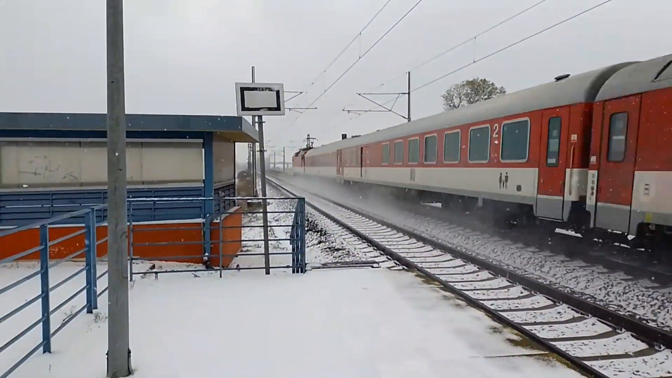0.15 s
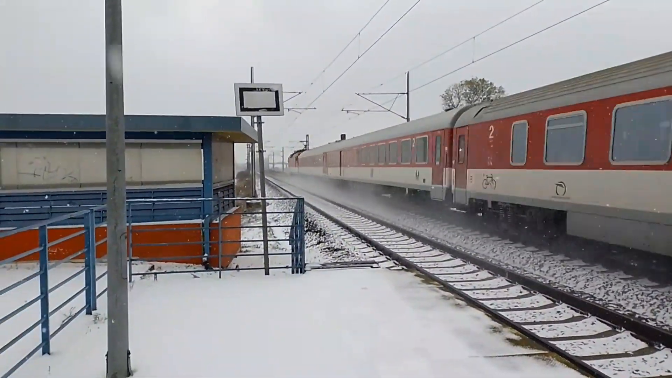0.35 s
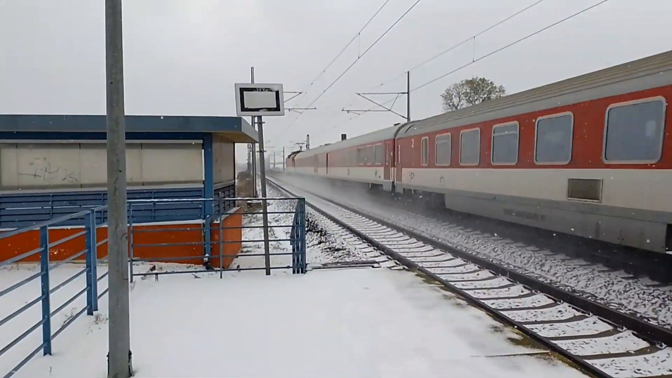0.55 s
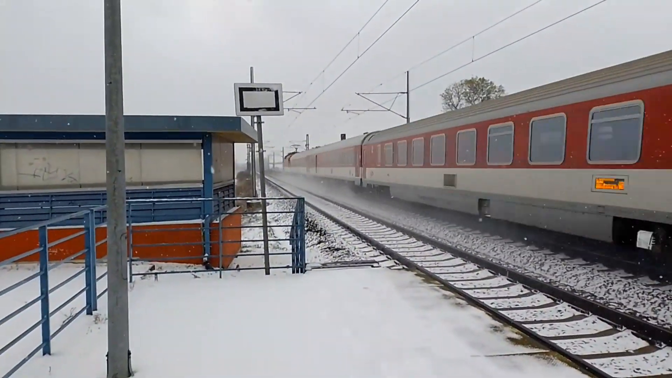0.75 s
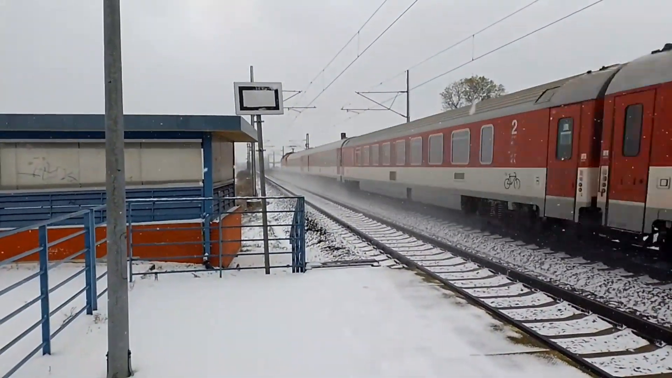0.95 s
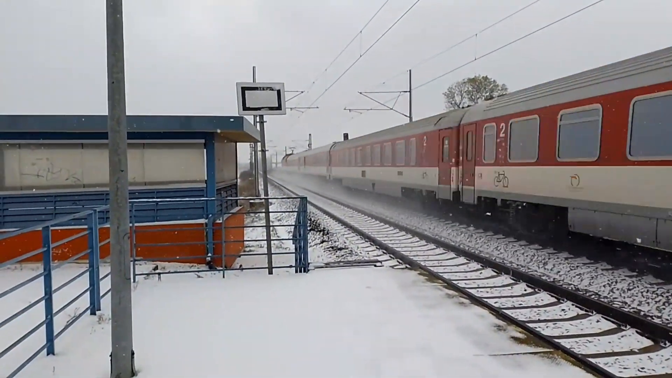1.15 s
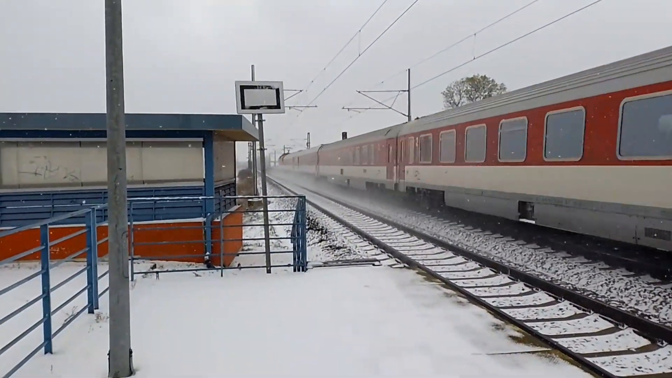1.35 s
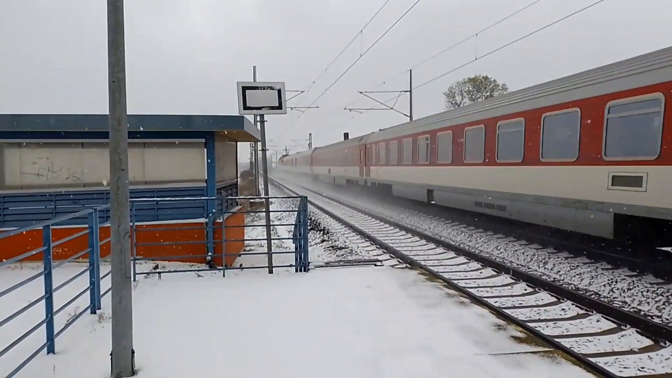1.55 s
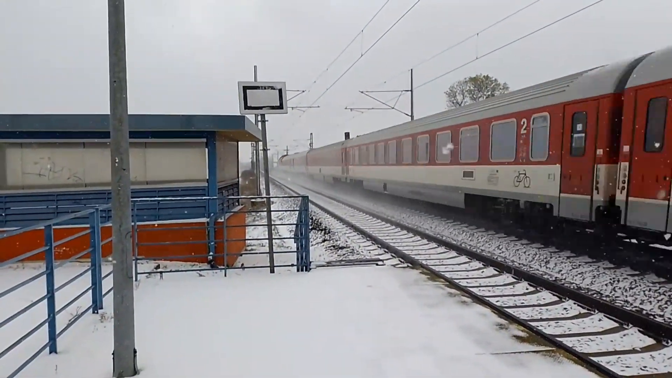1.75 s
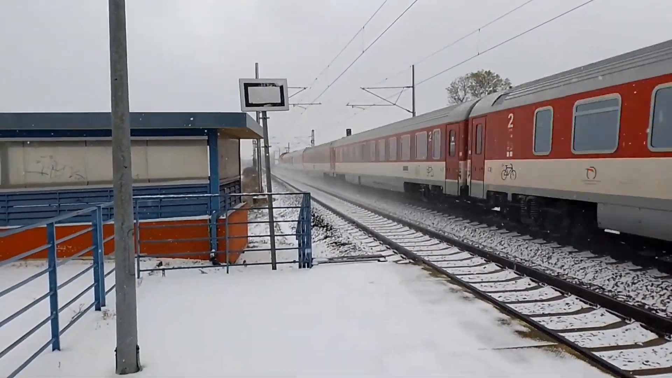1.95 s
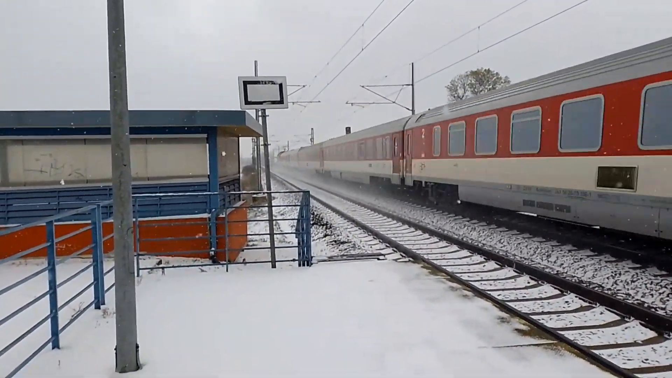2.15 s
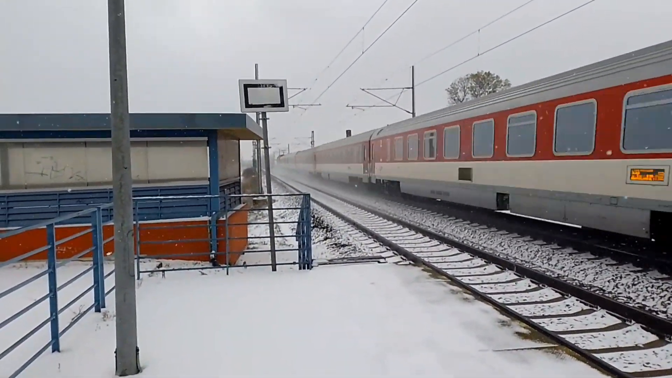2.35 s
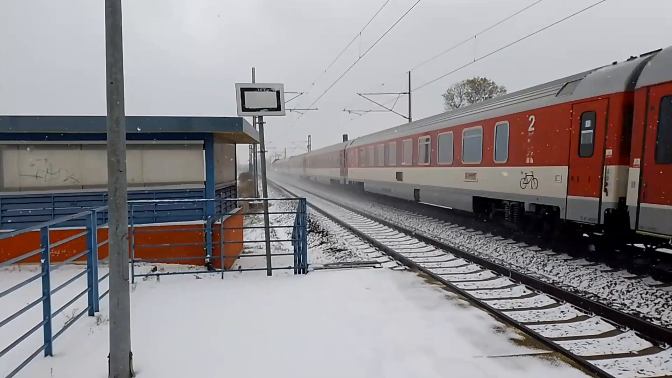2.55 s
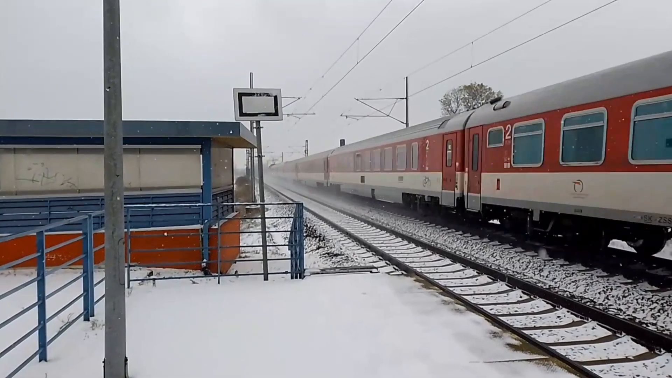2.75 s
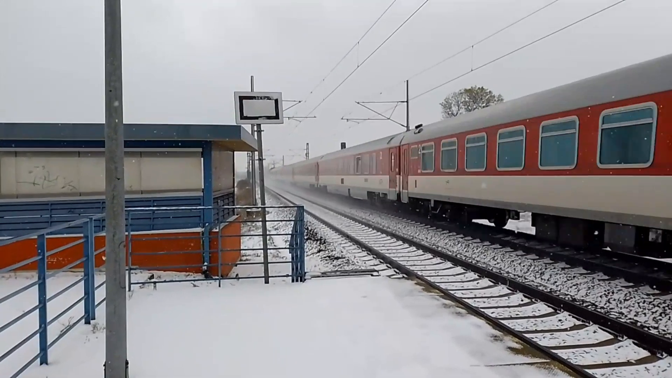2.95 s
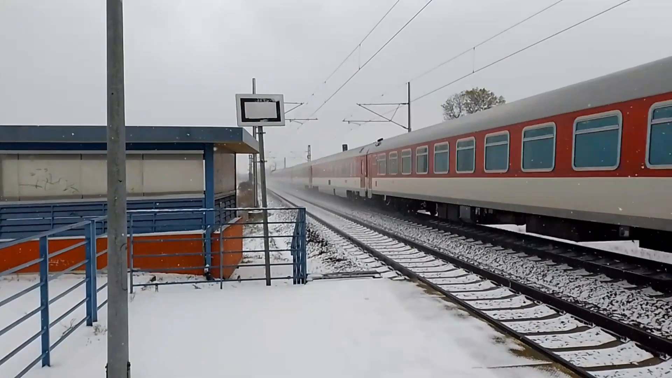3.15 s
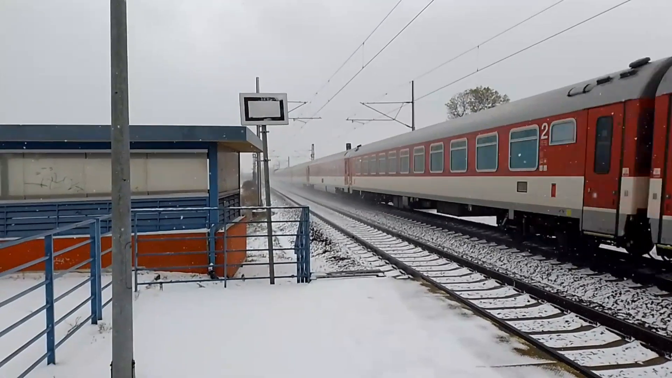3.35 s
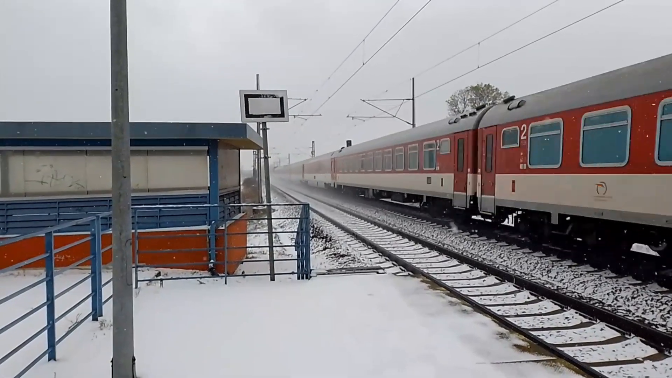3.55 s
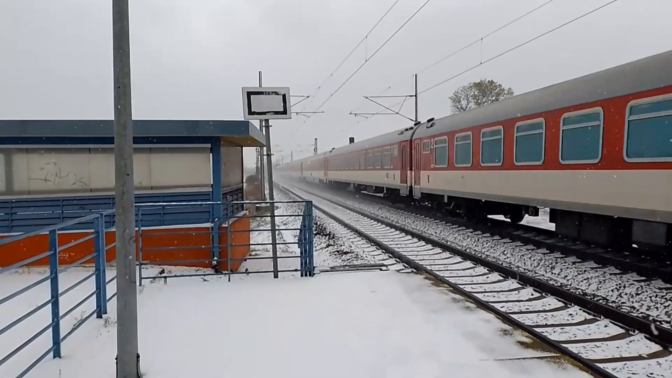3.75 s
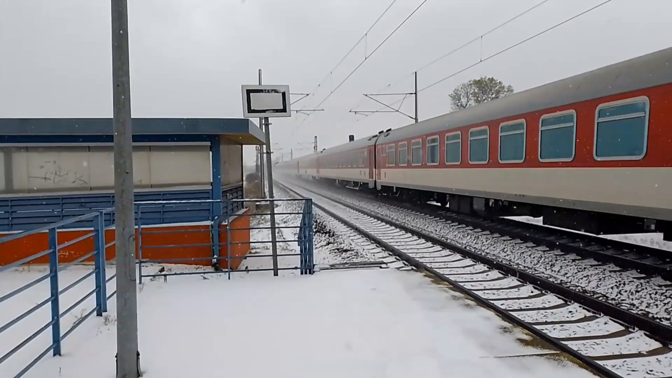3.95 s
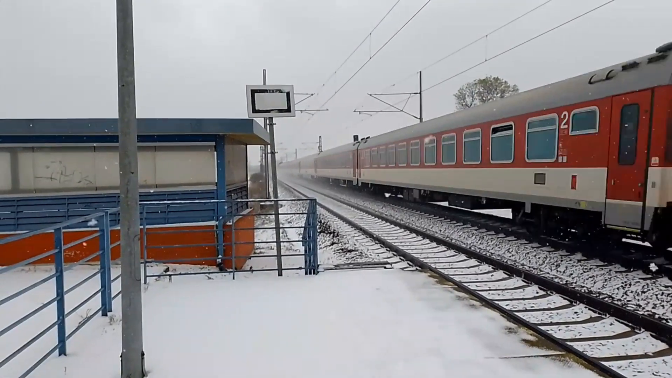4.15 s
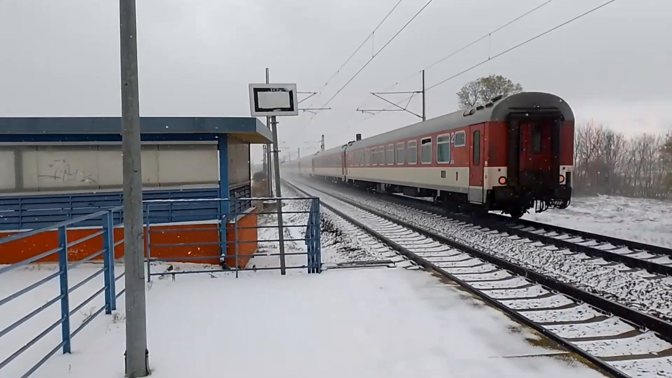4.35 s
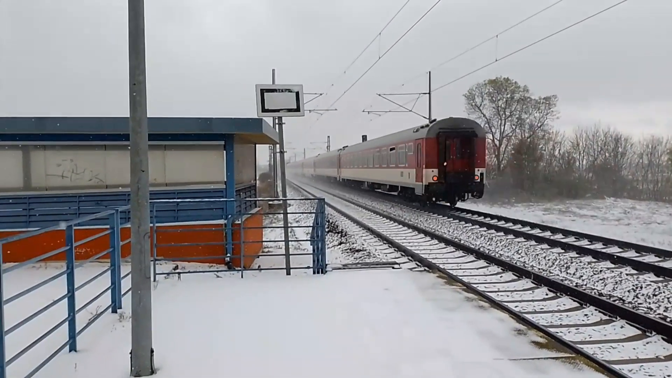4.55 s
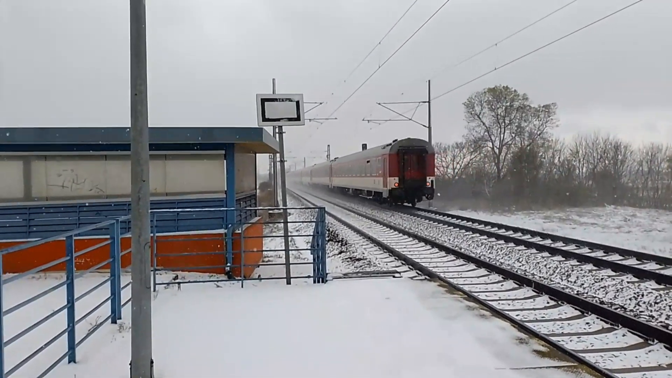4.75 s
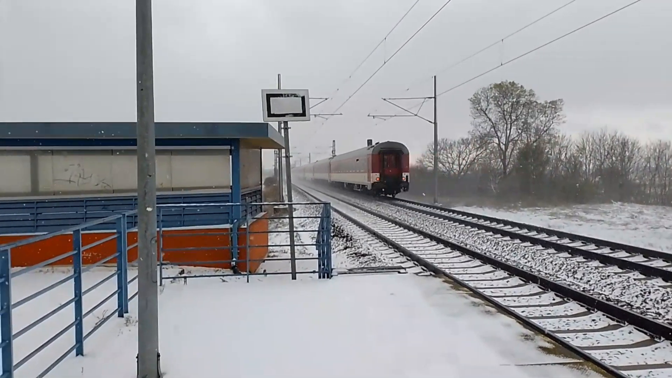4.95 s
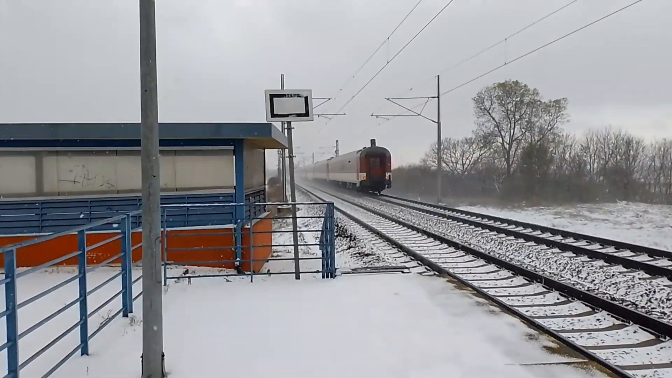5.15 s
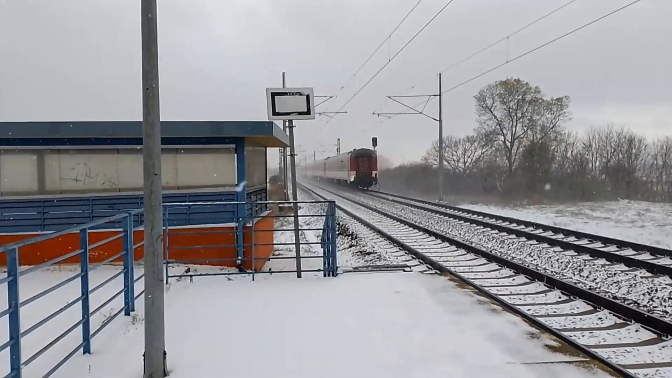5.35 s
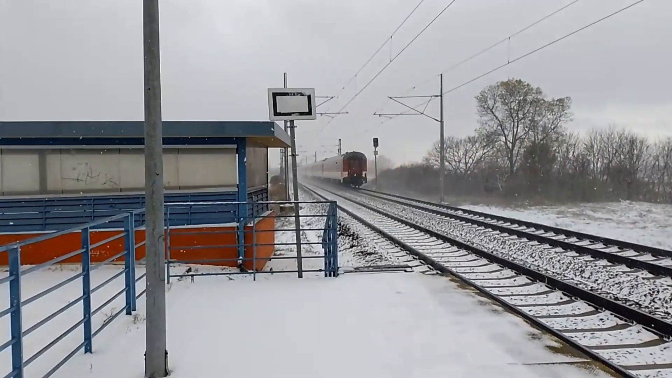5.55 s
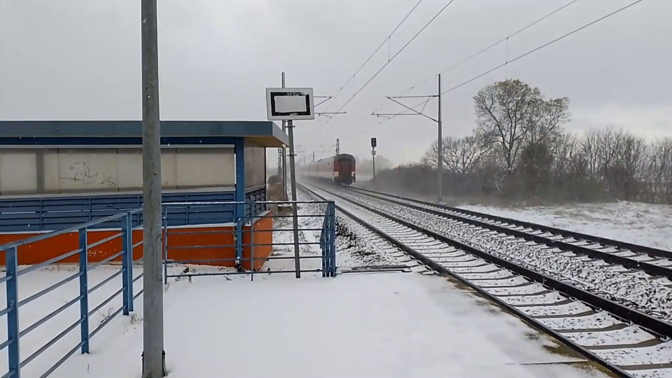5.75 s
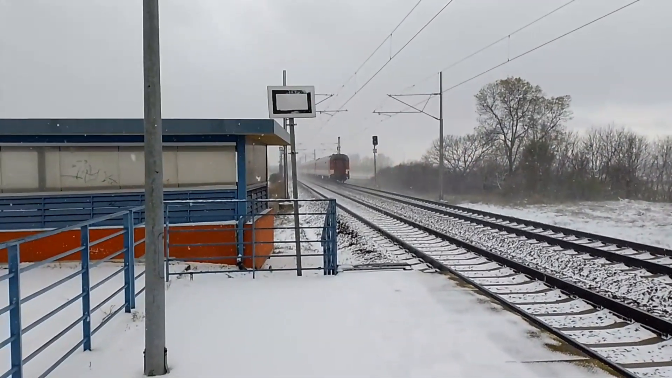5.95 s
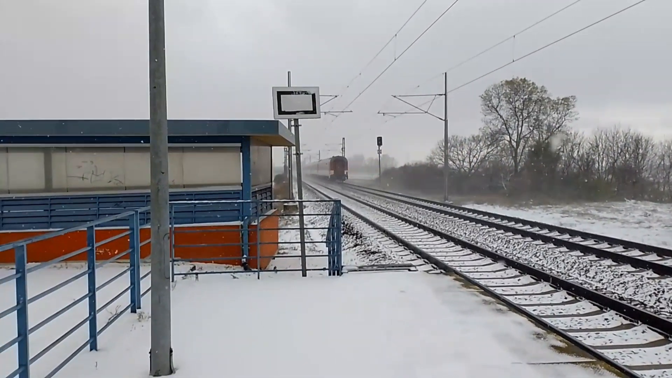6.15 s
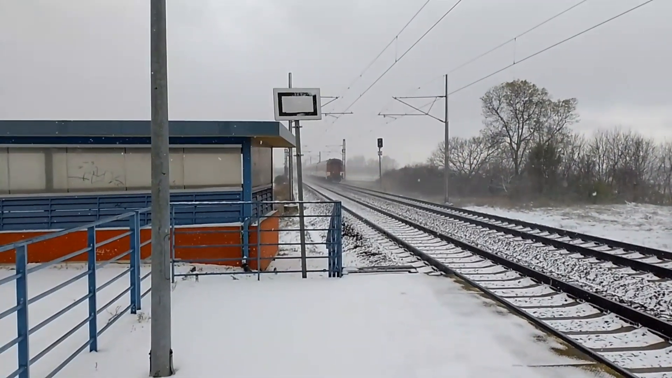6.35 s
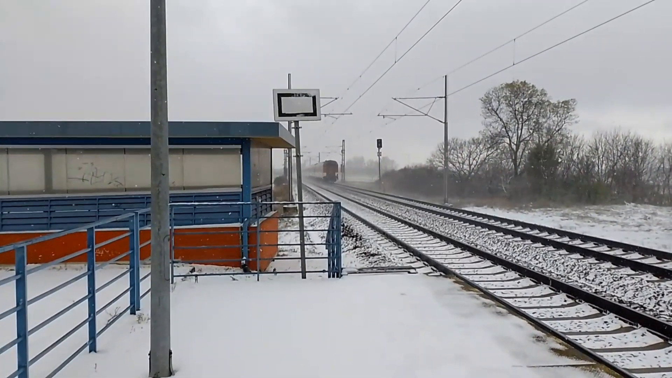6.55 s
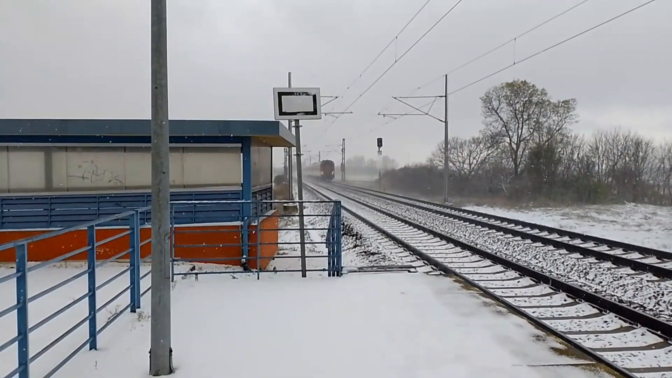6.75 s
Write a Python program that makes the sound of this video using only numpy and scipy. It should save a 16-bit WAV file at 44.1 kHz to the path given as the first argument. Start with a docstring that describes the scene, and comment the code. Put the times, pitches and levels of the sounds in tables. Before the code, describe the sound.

Loud rolling roar of fast railway coaches passing with clanking wheels and brief metallic squeals, dropping quickly to a thin rail hum and soft distant thuds.

```python
"""A passenger train rushes past a snowy platform at about 120 km/h and runs off into the distance.
Noise shaped by sleeper and rail resonances makes the rolling sound, swelling as each bogie comes abreast.
Wheel rings drop in pitch as they pass, short noise bursts make worn treads knock, and the ground rumbles.
After the last coach the rails go on singing in narrow bands, with soft thuds from far wheels.
A thin, bright hiss is strongest at first, and snow grains tick on the single microphone."""
import sys
import numpy as np
from scipy import signal
from scipy.fft import rfft, irfft
from scipy.io import wavfile
from scipy.ndimage import uniform_filter1d

SR = 44100
rng = np.random.default_rng(int(sys.argv[2]) if len(sys.argv) > 2 else 0)


def persist_wave(psi):
    """Save psi, clipped to +-1, as 16-bit WAV."""
    counts = np.round(np.clip(psi, -1, 1) * 32767).astype(np.int16)
    wavfile.write(sys.argv[1], SR, np.atleast_2d(counts).T)


N = 299880  # length in samples
SIZE = 2048  # samples in one short-time frame
HOP = SIZE // 4
HZ = np.fft.rfftfreq(SIZE, 1 / SR)
FRAME_S = np.arange(N // HOP + 5)[:, None] * HOP / SR
SAMPLE_S = np.arange(N) / SR

EDGE_HZ = 15700  # upper limit of the sound
SPEED, TRACK_DISTANCE = 33.2, 8.3  # metres per second, metres
WHEEL_TURN_HZ = 12  # average turns per second
RAIL_SAG_PER_S = 0.012  # share of pitch the rail's bending resonances lose per second, from 4.5 s on
HISS_LEAVES_S, HISS_FADE_DB_PER_S = 4.28, 38  # the last coach takes its hiss with it, quickly

# Colours of broad noise. Each row: frequency in Hz, relative level in dB per Hz.
AIR = [(20, -12), (55, 9), (170, -15), (450, -20), (1200, -4), (3000, -2.5), (6000, -32), (9500, -17),
       (11000, -26), (15500, -36)]
GROUND = [(20, -34), (40, -29), (60, -2), (85, 8.5), (106, 7), (140, 2), (180, -26), (400, -60)]
# The four parts of the rolling sound, from low to high.
THRUM = [(20, -56), (55, -47), (105, -25.5), (145, -9.5), (168, -43), (205, -1.5), (265, 0.5), (340, 3.5),
         (400, 0.5), (450, -9), (600, -52), (1200, -67)]
ROAR = [(280, -52), (440, -3.5), (540, 0), (690, 3), (790, -0.5), (900, -2.5), (1040, -3.5), (1300, -8),
        (1600, -29), (3000, -67)]
RUSH = [(900, -48), (1300, -11), (1480, -1), (1720, 0.5), (1970, -5.5), (2300, -1.5), (2800, -2.5),
        (3150, -6.5), (3700, -11.5), (6000, -59)]
HISS = [(2400, -51), (3300, -4), (4000, 1.5), (5500, 1), (6300, -2), (7500, -2.5), (8600, -7),
        (9700, -10.5), (10700, -27.5), (12500, -37), (15500, -46)]
# The two halves of a knock.
THUMP_COLOUR = [(120, -38), (185, -39), (230, -2), (275, 4.5), (450, -0.5), (680, 1.5), (950, -6),
                (1400, -6), (3000, -65)]
CLANK_COLOUR = [(700, -40), (1200, -6.5), (1620, 6), (1950, -5), (2500, 1.5), (3000, -2), (3700, -13),
                (8000, -19), (12000, -67)]

# Resonances of track and wheels. Each row: frequency in Hz, width in Hz, relative level in dB.
SLEEPER_MODES = [(231, 98, -11), (282.7, 33, 1.5), (331, 100, -7)]
BENDING_MODES = [(566, 100, -17), (656, 177, 0), (758, 150, -4), (905, 210, -6), (1010, 100, -18)]
SINGING_MODES = [(1543, 170, 0.5), (2127, 177, 1), (2590, 160, -5.5), (2830, 290, -10.5)]
HIGH_MODES = [(3770, 220, -10), (4520, 260, 15), (5440, 240, -2), (5700, 160, -5), (6100, 200, -8),
              (7120, 300, -4), (8000, 400, -5)]
FAINT_MODES = [(2920, 770, -2), (3610, 230, 4.5), (4250, 150, -3), (4500, 130, 4), (5300, 320, -6),
               (5660, 120, -7), (7130, 200, 1), (7750, 350, -5)]
WHEEL_MODES = [(1693, 280, 2), (2320, 150, -20), (4030, 180, -16), (5000, 170, -14), (7200, 280, -21)]

# Snow grains landing on the microphone.
# Each row: start in seconds, tick level in dB, crumbs level in dB, both before a high-pass.
SNOW = [(5.0525, -25.5, -52), (5.3, -68, -63), (5.325, -68, -63), (5.51, -68, -66), (5.54, -64, -63),
        (5.75, -64, -62)]
# A thin, bright hiss, strong at first, then quickly weaker. Each row: time in seconds, level in dB.
BRIGHT_HISS = [(0, -47.5), (.35, -52), (.65, -68.5), (3.3, -66), (4.0, -64), (4.4, -71), (4.9, -80),
               (6.8, -92)]
# Dulling of the treble (below zero it brightens). Each row: time in seconds, loss at 8 kHz in dB.
LOSS = [(0, -3), (3.4, 0.5), (3.8, 0), (4.3, 11.5), (4.8, -7.5), (6.8, 9)]
# Sound that the far track adds; before the first row it holds that row's levels.
# Each row: time in seconds, then levels in dB of sleepers, rail bending, rail singing, high hiss.
FAR = [(4.4, -47, -46, -40, -59), (4.75, -49, -44.5, -45.5, -59), (5.12, -50, -47.5, -46.5, -61.5),
       (5.33, -52.5, -48.5, -51.5, -65.5), (5.42, -55, -52, -59, -65), (5.53, -59, -54.5, -68, -66),
       (5.76, -55.5, -60.5, -66.5, -67), (5.93, -55, -59, -64, -68), (6.15, -62.5, -56, -64, -69),
       (6.35, -61, -56, -68.5, -68.5), (6.55, -68, -54, -66.5, -69.5), (6.8, -75, -53, -67, -69.5)]
# Far wheels thudding, carried back along the rail.
# Each row: start in seconds, frequency in Hz, level in dB.
THUDS = [(5.12, 288, -42), (5.19, 294, -44), (5.355, 660, -41), (5.45, 286, -41.5), (5.548, 285, -45),
         (5.553, 670, -44), (6.134, 660, -46), (6.228, 653, -46), (6.287, 640, -44), (6.323, 645, -41),
         (6.423, 653, -49), (6.521, 660, -44), (6.579, 660, -42), (6.624, 660, -44), (6.712, 660, -43)]
# A rail resonance that swells and fades. Each row: time in seconds, frequency in Hz, level in dB.
MOAN = [(0, 815, -28.5), (.45, 880, -44), (.9, 934, -34.5), (1.25, 910, -42), (1.5, 920, -36.5),
        (1.82, 895, -32), (2.05, 940, -37.5), (2.3, 955, -32.5), (2.55, 913, -31.5), (2.8, 836, -36),
        (3.4, 880, -43.5), (4.07, 890, -41), (4.4, 880, -61), (4.8, 880, -78)]
# Narrow tones and bands of wheels, bogies and rail. Each row: loudest time in seconds,
# length in seconds, frequency in Hz, width in Hz, share of the pitch lost per second, level in dB.
WHISTLES = [(.12, 0.33, 231, 60, 0.011, -38.5), (.95, .2, 225, 50, 0, -42), (.12, 0.18, 685, 70, 0.06, -30),
            (1.7, .25, 355, 70, .05, -40), (3.19, 0.24, 264, 55, 0.14, -34.5),
            (.13, .05, 1560, 110, .05, -31), (0.37, 0.062, 1535, 130, 0.053, -30),
            (.75, .28, 2130, 80, 0, -39), (1.3, .05, 1620, 80, 0, -39), (1.97, .08, 2130, 70, 0, -40),
            (2.75, .12, 1765, 100, 0.08, -29), (2.91, .045, 1695, 90, .14, -28),
            (3.75, .05, 1775, 70, 0, -38), (.07, .04, 3160, 150, 0, -35), (.08, .05, 2210, 90, 0, -34),
            (.56, 0.19, 2570, 60, 0.02, -35), (.5, 0.12, 4525, 55, 0, -41),
            (0.874, 0.055, 5530, 220, 0.13, -46), (1.627, .04, 4770, 70, 0.19, -46),
            (1.658, 0.16, 5580, 170, 0.12, -43), (1.65, 0.18, 7400, 260, .1, -46),
            (2.14, 0.095, 4170, 90, .25, -45.5), (2.51, 0.044, 4640, 80, .25, -41),
            (2.63, .08, 3000, 70, 0, -39), (2.74, 0.08, 4080, 90, 0.3, -38),
            (2.75, .11, 3650, 700, .2, -36.5), (2.82, 0.035, 2510, 110, 0.18, -33),
            (2.91, .05, 3590, 80, 0.17, -41), (3.04, 0.08, 5780, 90, 0.087, -41.5),
            (3.076, .04, 3920, 80, 0.29, -39), (3.1, .13, 4950, 60, .28, -40),
            (3.36, 0.1, 4570, 45, 0.12, -40.5), (3.25, .05, 3200, 80, .25, -38),
            (4.0, 0.064, 6950, 250, .2, -43), (4.045, 0.13, 8280, 700, 0.16, -49),
            (4.32, 0.08, 5500, 400, 0.097, -52), (4.41, 0.08, 4530, 170, 0, -50.5),
            (4.547, 0.098, 3620, 150, 0, -56), (4.44, 0.18, 7170, 190, 0.022, -55)]
# Worn treads striking the rail.
# Each row: start in seconds, thump level in dB, clank level in dB, decay in seconds.
KNOCKS = [(.04, -26, -22.5, 0.017), (0.086, -20, -37, 0.015), (.165, -35, -25.5, 0.018),
          (.33, -29.5, -26, 0.055), (.405, -28, -32, 0.017), (0.683, -44, -26.5, 0.014),
          (.765, -29, -35, 0.039), (0.896, -33, -33, 0.021), (1.402, -26.5, -31, 0.02),
          (1.452, -34, -29.5, 0.037), (1.509, -25.5, -28, 0.015), (1.576, -22.5, -31, 0.015),
          (1.728, -29, -27.5, .021), (1.796, -27, -34, 0.038), (1.936, -37, -29.5, 0.013),
          (2.303, -26, -25.5, 0.01), (2.386, -26, -38, 0.014), (2.655, -40, -23.5, 0.025),
          (2.745, -36, -20.5, 0.012), (2.809, -27.5, -31, 0.019), (2.98, -24, -26, 0.016),
          (3.067, -26, -24, 0.025), (3.25, -31, -23, 0.013), (3.348, -25.5, -33, .018),
          (3.427, -23, -20.5, 0.021), (3.606, -32, -29, 0.029), (3.829, -25, -36, 0.025),
          (3.928, -28, -25.5, 0.033), (4.012, -25.5, -25, 0.024), (4.183, -31, -30, 0.02),
          (4.289, -37, -37, .016)]
# Harsh grinding between wheel and rail.
# Each row: loudest time in seconds, length in seconds, rush level in dB, hiss level in dB.
GRINDS = [(0.09, 0.072, -28.5, -33.5), (0.36, 0.22, -28, -35.5), (2.733, 0.11, -34, -35.5)]
# Bogies going by, two at each coach joint and one at the tail. Each row: time abreast in seconds,
# levels in dB of thrum, roar, rush, hiss and ground shake (before the rumble's trim),
# extra coupling into the track in dB, wheel ring level in dB, wheel pitch factor before Doppler.
BOGIES = [(-.07, -32, -31.5, -29, -36, -64, 12.5, -46, 0.77),
          (.13, -33.5, -30, -28, -35, -49, 3, -36, 0.86), (.71, -34.5, -30.5, -33, -36.5, -48, -4, -57, 1),
          (.95, -38.5, -38, -30.5, -35, -49, 4.5, -42, 1),
          (1.53, -39, -35, -38, -36.5, -59, -6, -36.5, 0.98),
          (1.76, -39, -35.5, -31, -35, -49.5, -3, -38, 1.1),
          (2.33, -35.5, -35, -51, -35, -51, -13, -33, 0.984),
          (2.57, -35, -29.5, -26.5, -33, -51, -7, -32.5, 1.025),
          (3.071, -32, -26, -27.5, -33.5, -53.5, 3, -27, 0.995),
          (3.33, -35.5, -33.5, -28, -32, -54, 4.5, -34.5, .97),
          (3.97, -36.5, -35, -33.5, -36.5, -52, 0.5, -48, 1.03)]
# Bands that die out along the rail (below zero they gain).
# Each row: frequency in Hz, width in Hz, loss in dB.
STOP_BANDS = [(452, 160, 1), (1180, 140, 1), (1750, 240, 6), (2450, 140, 1), (3470, 170, 2),
              (4150, 390, 16), (5070, 410, 8), (6400, 430, 12), (7600, 300, -1)]
# The last wheels leave direct earshot between these two times, in seconds.
TAIL_LEAVES_S = [4, 4.2]
# Upper edge of the rail's bending band. Each row: time in seconds, frequency in Hz.
BENDING_EDGE = [(4.5, 1200), (5.05, 1060), (5.35, 910), (5.6, 770), (5.8, 736), (6.8, 770)]


def amp(db):
    """Turns decibels into gain."""
    return 10 ** (np.asarray(db) / 20)


def evened(x):
    """Scales a signal to an rms of 1."""
    return x / np.sqrt(np.mean(x ** 2) + 1e-20)


def unit(power):
    """Scales each power spectrum to a mean of 1."""
    return power / (power.mean(-1, keepdims=True) + 1e-20)


def follow(rows, t):
    """Reads the columns of a curve table at the times t."""
    s, *columns = np.transpose(rows)
    return [np.interp(t, s, c) for c in columns]


def broad(points, hz=HZ):
    """Draws a power spectrum through points on a log-frequency axis."""
    f, db = np.transpose(points)
    return unit(amp(np.interp(np.log(hz + 1), np.log(f), db)) ** 2)


def ringing(modes, shift=1):
    """Power spectrum of steep-sided resonances, all moved in pitch by the factor shift."""
    power = 0
    for hz, width, db in modes:
        slope = 1 / (1 + (2 * (HZ - hz * shift) / width) ** 2)
        power = power + amp(db) ** 2 * slope ** 3
    return unit(power)


def noise(power):
    """Makes random noise that follows a power spectrum, frame by frame."""
    a, b = rng.standard_normal((2, len(FRAME_S), len(HZ)))
    spectra = (a + 1j * b) * np.sqrt(power * 3 / SIZE)
    return signal.istft(spectra.T, nperseg=SIZE, noverlap=SIZE - HOP)[1][:N]


def wander(rate_hz):
    """Slow random drift of rms 1, with little movement faster than the given rate."""
    hz = np.fft.rfftfreq(N, 1 / SR)
    smooth = rfft(rng.standard_normal(N)) / (1 + (hz / rate_hz) ** 4)
    return evened(irfft(smooth, N))


def patches(depth_db, size):
    """Gain that drifts at random in patches of size (frames, frequency bins)."""
    field = rng.standard_normal((len(FRAME_S), len(HZ)))
    field = uniform_filter1d(field, size[0], 0)
    field = uniform_filter1d(field, size[1], 1)
    return amp(depth_db * evened(field))


def add(mix, s, sound):
    """Mixes a sound in at time s."""
    part = mix[max(round(s * SR), 0):][:len(sound)]
    part += sound[:len(part)]


def open_air(level_db=-69):
    """The quiet of the snowy fields is a faint, steady noise."""
    return amp(level_db) * noise(broad(AIR))


def snow_ticks(ring_hz=9200, length_s=0.00018, crumble_s=0.016, crumbs_per_s=700):
    """A landing grain gives a tick of a few cycles, then crumbles in random specks."""
    out = np.zeros(N)
    t = np.arange(-SR // 1000, SR // 20) / SR
    bright = signal.butter(4, 7200, "high", fs=SR, output="sos")
    tick = np.exp(-(t / length_s) ** 2) * np.cos(2 * np.pi * ring_hz * t)
    for s, tick_db, crumbs_db in SNOW:
        specks = rng.standard_normal(len(t)) * (rng.random(len(t)) < crumbs_per_s / SR)
        crumbs = (t > 0) * np.exp(-t / crumble_s) * evened(specks)
        grain = amp(tick_db) * tick + amp(crumbs_db) * crumbs
        add(out, s + t[0], signal.sosfilt(bright, grain))
    return out


def bright_hiss(centre_hz=12000, width_hz=6000):
    """A wide band of high noise makes a thin, bright hiss, strong at first, then quickly weaker."""
    return noise(ringing([(centre_hz, width_hz, 0)])) * amp(follow(BRIGHT_HISS, SAMPLE_S)[0])


def treble_gain():
    """The treble is dulled more and more towards high frequencies, by an amount that varies in time."""
    return amp(-follow(LOSS, FRAME_S)[0] * (HZ / 8000) ** 2)


def far_hiss(modes_db=1.0):
    """The rails give a thin hiss with faint resonances, which sinks after the train, then stays faint."""
    colour = broad(HISS) + amp(modes_db) ** 2 * ringing(FAINT_MODES)
    return noise(unit(colour * treble_gain() ** 2)) * amp(follow(FAR, SAMPLE_S)[3])


def thuds(rise_cycles=1.3):
    """A far blow arrives as a few cycles of a sleeper or rail resonance."""
    out = np.zeros(N)
    t = np.arange(SR // 12) / SR
    for (s, hz, db), phase in zip(THUDS, rng.random(len(THUDS))):
        shape = t ** 2 * np.exp(-hz * t / rise_cycles)
        tone = np.sin(2 * np.pi * (hz * t + phase))
        add(out, s, amp(db) * shape / shape.max() * tone)
    return out


def metres_off():
    """How far each bogie is along the track from the microphone, frame by frame."""
    return abs(SPEED * (FRAME_S - np.transpose(BOGIES)[0]))


def abreast(bogie_db, reach_m):
    """Power beamed sideways by all bogies: it swells as each comes within reach."""
    power = amp(bogie_db) ** 2 * np.exp(-(metres_off() / reach_m) ** 2)
    return power.sum(1, keepdims=True)


def along_track(bogie_db, share_db, loss_db_per_m):
    """Power that all bogies send along the track, which loses a little in every metre."""
    coupling_db = np.transpose(BOGIES)[6]
    level_db = bogie_db + coupling_db + share_db - loss_db_per_m * metres_off()
    return (amp(level_db) ** 2).sum(1, keepdims=True)


def rumble(level_db=-2, lumps_db=1.2):
    """The ground heaves under each bogie, and carries an uneven rumble a long way."""
    shake_db = np.transpose(BOGIES)[5]
    power = abreast(shake_db, reach_m=1.7) + along_track(shake_db, share_db=-10.5, loss_db_per_m=0.2)
    return noise(power * broad(GROUND)) * amp(level_db + lumps_db * wander(12))


def moan(width_hz=75):
    """One narrow band of the rail drifts in pitch and level as the wheels go by."""
    hz, db = follow(MOAN, FRAME_S)
    return noise(ringing([(hz, width_hz, 0)]) * amp(db) ** 2)


def whistles(broken_db=2.1):
    """Narrow tones and bands of wheels, bogies and rail swell briefly, unevenly, some sliding down."""
    power = 0
    for s, length, hz, width, fall, db in WHISTLES:
        since = FRAME_S - s
        tone = ringing([(hz, width, 0)], 1 - fall * np.clip(since, -1, 1))
        swell = amp(db) ** 2 * np.exp(-(since / length) ** 2)
        power = power + tone * swell
    return noise(power) * evened(amp(broken_db * wander(16)))


def knocks(rise_s=0.0034):
    """Each blow thumps the rail and sleeper and sets the wheel clanking."""
    out = np.zeros(N)
    t = np.arange(SR // 5) / SR
    hz = np.fft.rfftfreq(len(t), 1 / SR)
    thump, clank = broad(THUMP_COLOUR, hz), broad(CLANK_COLOUR, hz)
    for s, thump_db, clank_db, decay_s in KNOCKS:
        shape = (1 - np.exp(-t / rise_s)) ** 2 * np.exp(-t / decay_s)
        colour = np.sqrt(amp(thump_db) ** 2 * thump + amp(clank_db) ** 2 * clank)
        burst = irfft(rfft(rng.standard_normal(len(t))) * colour, len(t))
        add(out, s, burst * shape / shape.max())
    return out


def wheels(beam=2.12):
    """Wheels ring sideways: loudest when abreast, and falling in pitch as they pass."""
    power = 0
    for s, *_, db, pitch in BOGIES:
        along = SPEED * (FRAME_S - s)
        distance = np.hypot(along, TRACK_DISTANCE)
        doppler = 1 / (1 + SPEED / 343 * along / distance)  # sound travels at 343 m/s
        gain = amp(db) * (TRACK_DISTANCE / distance) ** beam
        power = power + ringing(WHEEL_MODES, pitch * doppler) * gain ** 2
    return noise(power)


def grinding(singing_db=-1, patchy_db=2.0):
    """Now and then the wheels grind harder, in a rough, bright swell."""
    rush = unit(broad(RUSH) + amp(singing_db) ** 2 * ringing(SINGING_MODES))
    power = 0
    for s, length, rush_db, hiss_db in GRINDS:
        colour = amp(rush_db) ** 2 * rush + amp(hiss_db) ** 2 * broad(HISS)
        power = power + colour * np.exp(-((FRAME_S - s) / length) ** 2)
    return noise(power * unit(patches(patchy_db, size=(8, 4)) ** 2))


def stop_bands():
    """Bands that the rail does not carry empty once the last wheels have gone by."""
    loss_db = sum(db * np.exp(-(2 * (HZ - hz) / width) ** 2) for hz, width, db in STOP_BANDS)
    return amp(-loss_db * np.interp(FRAME_S, TAIL_LEAVES_S, [0, 1]))


def closing_edge(depth_db=10, soft_hz=45):
    """The top of the rail's bending band is turned down as the train recedes."""
    above = .5 + .5 * np.tanh((HZ - follow(BENDING_EDGE, FRAME_S)[0]) / soft_hz)
    return amp(-depth_db * above)


def track_part(near, carried, spectrum, modes, leak_db, patchy_db, shift=1, shade=1):
    """Broad noise while wheels are near; mostly the resonances travel back along the rail."""
    resonant = ringing(modes, shift) * shade ** 2
    leak = amp(leak_db) ** 2 * broad(spectrum)
    power = near * broad(spectrum) + carried * unit(resonant + leak)
    grain = patches(patchy_db, size=(8, 4)) * stop_bands()
    # the gains change only the colour: unit() keeps the overall level
    colour = unit(power * (grain * treble_gain()) ** 2)
    return noise(colour * (near + carried))


def rolling(throb_db=0.5, flutter_db=0.5, far_flutter_db=0.75):
    """Rough treads drive the track, throbbing once for each turn of the wheels."""
    thrum_db, roar_db, rush_db, hiss_db = np.transpose(BOGIES)[1:5]
    far_sleepers, far_bending, far_singing, _ = amp(follow(FAR, FRAME_S)) ** 2
    sag = 1 - RAIL_SAG_PER_S * (np.maximum(FRAME_S, 4.5) - 5.7)
    turns = np.cumsum(WHEEL_TURN_HZ * (1 + .02 * wander(1.9))) / SR
    throb = np.exp(-(turns % 1) / 0.22)
    shake_db = throb_db * evened(throb - throb.mean()) + flutter_db * wander(10.5)
    # the sound of far wheels arrives in uneven lumps
    lumps_db = far_flutter_db * np.interp(SAMPLE_S, [4.5, 5.6], [0, 1]) * wander(35)

    sleepers = track_part(
        abreast(thrum_db, reach_m=9.0),
        along_track(thrum_db, share_db=-4.0, loss_db_per_m=2.0) + far_sleepers,
        THRUM, SLEEPER_MODES, leak_db=-38, patchy_db=0.7)
    bending = track_part(
        abreast(roar_db, reach_m=10.8),
        along_track(roar_db, share_db=-0.5, loss_db_per_m=3.5) + far_bending,
        ROAR, BENDING_MODES, leak_db=-19, patchy_db=1.0, shift=sag, shade=closing_edge())
    singing = track_part(
        abreast(rush_db, reach_m=11.06),
        along_track(rush_db, share_db=-5.0, loss_db_per_m=6.5) + far_singing,
        RUSH, SINGING_MODES, leak_db=-33, patchy_db=2)
    hiss = track_part(
        abreast(hiss_db, reach_m=9.6),
        along_track(hiss_db, share_db=-21.0, loss_db_per_m=5.0),
        HISS, HIGH_MODES, leak_db=-10, patchy_db=2.3)
    hiss = hiss * amp(-HISS_FADE_DB_PER_S * np.maximum(SAMPLE_S - HISS_LEAVES_S, 0))

    body = (sleepers + bending + singing) * amp(shake_db + lumps_db)
    return body + hiss * amp(0.3 * shake_db + 0.36 * lumps_db)  # the hiss shakes less


def scene():
    """Everything reaches one microphone, the same in both channels."""
    surroundings = open_air() + snow_ticks() + bright_hiss()
    track = far_hiss() + thuds() + rumble() + moan()
    train = whistles() + knocks() + wheels() + grinding() + rolling()
    mono = surroundings + track + train
    return np.array([mono, mono])


def record(dry):
    """The microphone has a narrow notch in the bass; then a low-pass removes the highest treble."""
    notched = signal.lfilter(*signal.iirnotch(168, 5.5, fs=SR), dry)
    low_pass = signal.firwin(511, EDGE_HZ, window=("kaiser", 9), fs=SR)
    return signal.oaconvolve(notched, low_pass[None], "same")


dry = scene()
out = record(dry)
persist_wave(out)
```